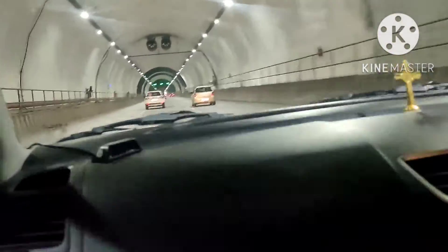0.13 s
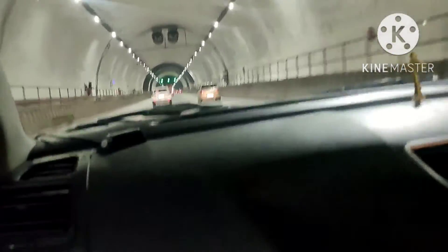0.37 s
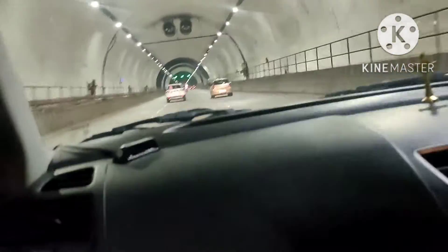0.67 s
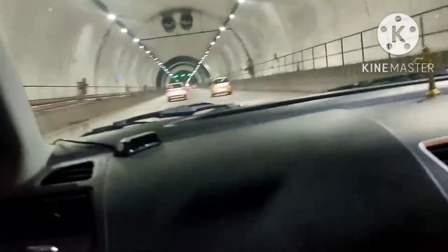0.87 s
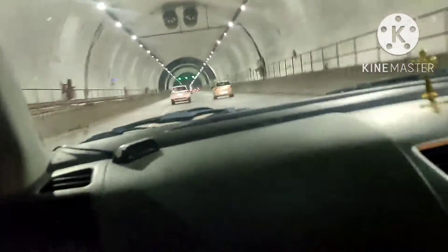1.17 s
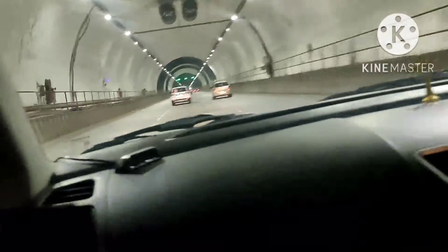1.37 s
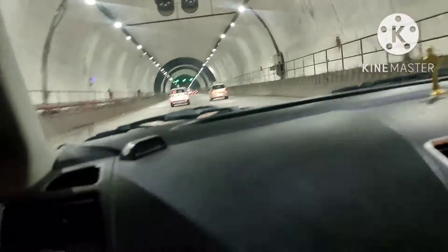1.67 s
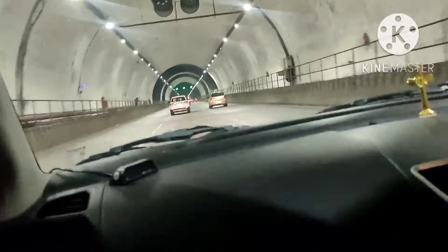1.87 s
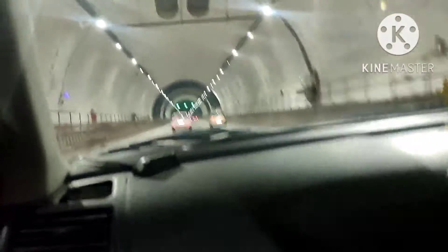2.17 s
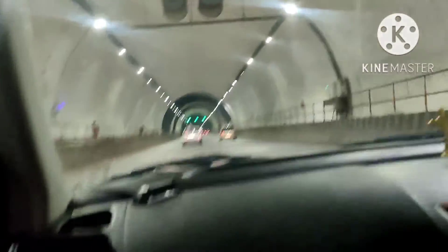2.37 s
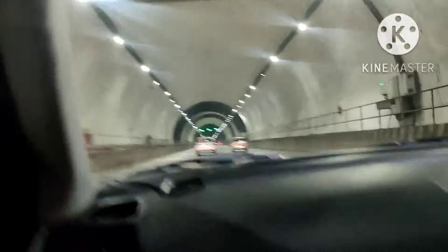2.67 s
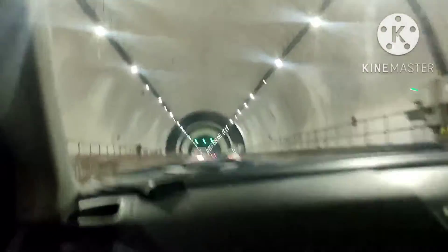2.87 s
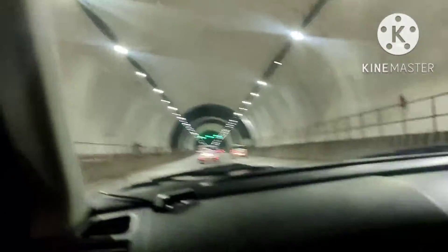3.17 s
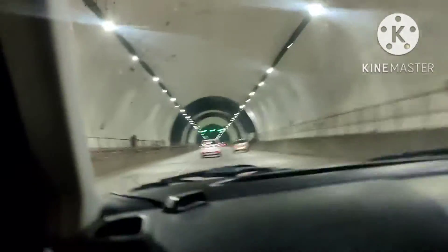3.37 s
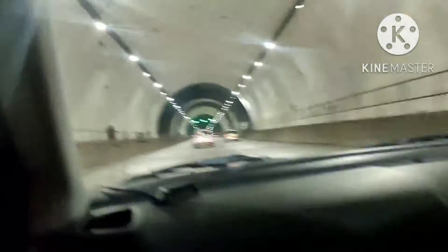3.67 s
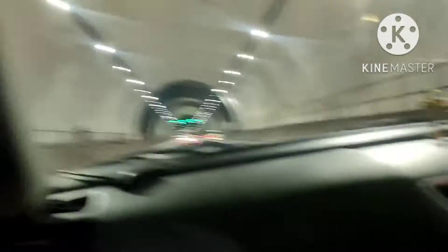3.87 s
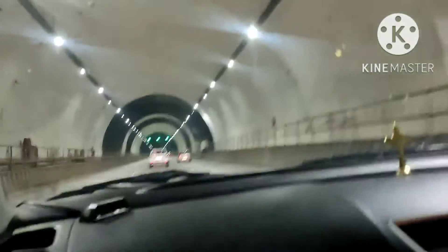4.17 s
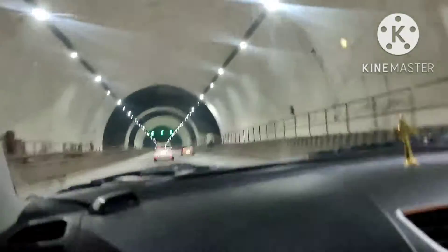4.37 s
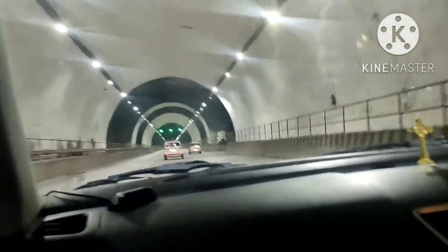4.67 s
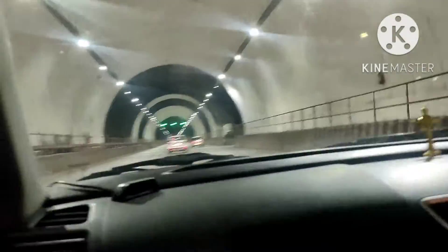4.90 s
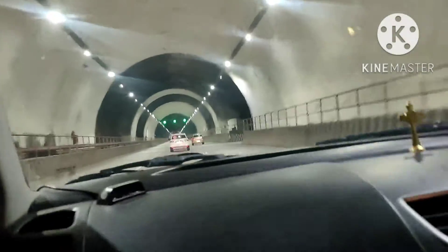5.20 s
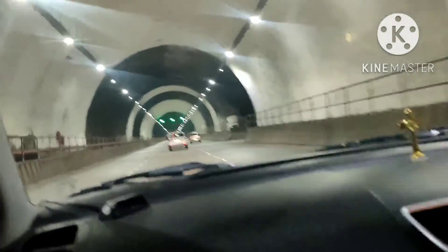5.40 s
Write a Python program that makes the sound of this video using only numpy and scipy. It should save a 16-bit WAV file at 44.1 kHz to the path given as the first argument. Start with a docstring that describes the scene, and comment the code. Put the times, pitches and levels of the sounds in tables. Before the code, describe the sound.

From the start, a deep, steady rumble fills the cabin of a car cruising through a road tunnel. The tyres add a wavering low hum and growl, and their smooth roar returns from the walls, muffled by the glass. A thin air hiss sits far behind. Loose plastic trim ticks lightly, close by and slightly left, most clearly at the very start and around 0.5 seconds. Dull, deep thuds mark road joints, with one near 1.7 seconds. From about 2.4 to 2.9 seconds a rough stretch brings the loudest rumble, a quick cluster of bumps and a small plastic chatter. The ride eases briefly at 3 seconds, then more thuds come near 3.4, 4 and 5.2 seconds. Scattered ticks and faint, hissy plastic rubbing continue around 3.6 to 5.1 seconds. The rumble carries on to the end at about 5.5 seconds.

```python
"""Inside a car cruising through a long road tunnel.
The road shakes the body, thuds at its joints and sets the cabin booming at its low modes.
The tyres hum and growl; their roar comes back from the tunnel walls through the glass.
Loose plastic trim ticks and rubs on the left, and chatters over a rough stretch halfway through.
A thin hiss of air sits behind it all."""
import sys
import numpy as np
from scipy import signal
from scipy.fft import rfft, irfft
from scipy.io import wavfile
from scipy.ndimage import uniform_filter1d

SR = 44100
rng = np.random.default_rng(int(sys.argv[2]) if len(sys.argv) > 2 else 0)


def wav_record(signal):
    """Record a signal, one row per channel, as 16-bit PCM in the file named by sys.argv[1]."""
    frames = np.transpose(np.atleast_2d(signal))
    bounded = np.clip(frames, -1, 1)
    # unit amplitude maps onto the largest positive 16-bit level
    quanta = np.round(bounded * 32767).astype(np.int16)
    wavfile.write(sys.argv[1], SR, quanta)


N = 244314
TIME, HZ = np.arange(N) / SR, np.maximum(np.arange(N // 2 + 1) * SR / N, 1)
SIDES = np.array([[1], [-1]])   # left, right; a positive pan_db leans left

# modes of the plastic trim: pitch_hz, level_db, t60_s, pan_db
PLASTIC_MODES = [(1900, -13, 0.017, 7.5), (2600, -5.5, 0.0068, -5), (3080, -10.5, 0.018, 1.5),
                 (3480, -7, 0.0077, -3), (4310, -6.5, 0.0073, 10), (5000, -5, 0.006, -4),
                 (5550, -9, 0.0046, 6), (6020, 0, 0.0047, 9), (6500, -1, 0.0068, 0), (7250, -9, 0.016, -15)]


def rumble(rough_db, body_lift_db, drone_lift_db):
    """Road texture drives the body and the cabin air; the air ring in the tyres hums."""
    # modes of the shaking body: pitch_hz, width_hz, level_db
    body_modes = [(22.3, 33, -7), (39.6, 22.4, -7), (45.5, 18, -12), (70.9, 6.2, -8)]
    # modes of the cabin air: pitch_hz, width_hz, level_db
    cabin_modes = [(100.2, 15, 0), (119, 18, 1), (133.5, 22, -6), (187, 24.1, -4.5)]
    # cabin drone on the usual road: time_s, level_db
    drone = [(0, -38.5), (.35, -32), (.52, -35.5), (.72, -33), (.9, -34), (1.3, -35), (2.4, -33),
             (3.2, -32), (4, -31.5), (4.7, -30.5), (5.54, -35)]
    body_db = -25.5 + 0.65 * rough_db + body_lift_db
    body = from_db(body_db) * steady(resonant_noise(body_modes), span_s=0.11)
    cabin_db = over_time(drone) + 0.76 * rough_db + drone_lift_db
    cabin = from_db(cabin_db) * steady(resonant_noise(cabin_modes), span_s=0.2)
    hum = from_db(-39.5 + 0.68 * rough_db) * steady(resonant_noise([(165.9, 14.0, 0)]), span_s=0.2)
    return body + cabin + hum * from_db(0.5 * throb(per_s=15))


def swells_and_dips(rise_s, fall_s):
    """Brief swells and dips in the body rumble, the drone and the growl, as three curves in dB."""
    # swells (+) and dips (-): centre_s, body_db, drone_db, growl_db
    lifts = [(0.221, -11.5, 8.5, -5), (1.2, 2, 5.5, -4.5), (1.86, -2, -2, 2), (2.01, 1.5, 4.5, -0.5),
             (2.111, 0, -2.5, 7.5), (2.37, 1, 5.5, 4), (2.58, 1, -3, -2.5), (2.639, -3, 3, 6.5),
             (2.765, 3, 2, -4.5), (2.82, 1.5, -5.5, 2), (3.01, -1, -8, 2.5), (3.402, 1.5, 4.5, 0),
             (3.56, 3, 7, -4.5), (3.77, 1, 0.5, 3.5), (3.98, 4, 2.5, -2), (4.119, 0, 3.5, -13.5),
             (4.65, 0.5, -2, 6.5), (5.12, 0.5, -3, -12), (5.22, -10, 5, 1), (5.41, 5.5, 6.5, -0.5)]
    return sum(np.outer(lifts_db, swell(s, rise_s, fall_s)) for s, *lifts_db in lifts)


def thuds(rise_s):
    """A road joint kicks the body through the suspension into one or two heavily damped swings."""
    # joints in the road: start_s, level_db, pitch_hz
    joints = [(0.424, -22, 61.7), (0.858, -24, 42), (1.38, -22, 36.3), (1.693, -15, 49.5), (2.389, -19, 40),
              (2.53, -17.5, 41.2), (2.56, -15.5, 94), (2.612, -12.5, 42.7), (2.625, -20, 135),
              (2.652, -19.5, 70), (2.69, -17, 45), (2.757, -12.5, 54.8), (2.801, -10, 39.7),
              (2.835, -16, 36.7), (3.377, -10, 35.6), (3.858, -15, 47), (3.986, -14.5, 44),
              (4.122, -17.5, 35.7), (5.188, -14, 42.6), (5.382, -20.5, 39.8)]
    out = np.zeros(N)
    for s, db, hz in joints:
        age = np.maximum(TIME - s, 0)
        envelope = age / rise_s * np.exp(1 - age / rise_s)
        out += from_db(db) * envelope * np.sin(2 * np.pi * hz * age)
    return out


def hum_swells(rise_s, fall_s, pan_db):
    """Now and then the air ring in a tyre builds up to a nearly pure tone and dies away."""
    # swells of the tyre hum: peak_s, level_db, pitch_hz
    swells = [(0.019, -28.5, 168.5), (.09, -26.5, 172), (.24, -30.5, 174.9), (.49, -27, 177.4),
              (0.649, -32.5, 174), (0.871, -29.5, 175.4), (1.1, -27.5, 166), (1.25, -33, 180),
              (1.38, -32, 173.6), (1.5, -27, 174.6), (1.71, -29.5, 160), (1.809, -24, 172),
              (2.035, -26.5, 165), (2.16, -27, 168), (2.29, -26, 166.4), (2.4, -24.5, 166.8),
              (2.63, -31, 174.3), (2.91, -26, 163), (3.13, -30.5, 167.4), (3.26, -27, 168),
              (3.439, -22.5, 172.9), (3.605, -28.5, 169.6), (3.885, -21, 166.1), (4.11, -31.5, 171),
              (4.231, -30.5, 173), (4.929, -30.5, 169.8), (5.02, -30, 166.5), (5.24, -22, 165.5)]
    tones = np.zeros(N)
    for s, db, hz in swells:
        tones += from_db(db) * swell(s, rise_s, fall_s) * np.sin(2 * np.pi * (hz * TIME + rng.random()))
    return tones * pan(pan_db)


def tyres(rough_db, growl_lift_db):
    """Tread noise growls in the panels and returns from the tunnel as a smooth, slowly sinking roar."""
    # panels driven by the tyres: pitch_hz, width_hz, level_db
    panel_modes = [(239.7, 34, -0.5), (295, 37, -3), (327.6, 17, 0)]
    # stiffer panels: pitch_hz, width_hz, level_db
    stiff_modes = [(439, 71, -2), (522, 68, -0.5)]
    # colour of the tunnel roar: frequency_hz, level_db
    roar_colour = [(150, -13.5), (300, -5.5), (450, -3), (600, -3.5), (760, -3.5), (1050, -4.5), (1450, -9),
                   (2200, -12.5), (2800, -19.5), (4000, -25.5), (8000, -49.5)]
    # tread resonances: pitch_hz, width_hz, level_db
    tread_modes = [(883.4, 52, -1.5), (1160, 15, -2)]
    growl_db = -42 + 0.46 * rough_db + growl_lift_db
    growl = from_db(growl_db) * steady(resonant_noise(panel_modes), span_s=0.28)
    stiff = from_db(-49.5 + 0.46 * rough_db) * resonant_noise(stiff_modes)
    roar = from_db(-46.5 - 0.15 * TIME) * cabin_noise(from_db(over_hz(roar_colour)))
    tread = from_db(-53.5 - 0.7 * TIME) * resonant_noise(tread_modes)
    return growl + stiff + roar + tread


def ticks(scatter_db, detune):
    """Each tick is a contact and a few quick rebounds; each spot of the trim adds its own short ring."""
    # trim contacts: start_s, level_db, low_modes_db, top_modes_db, pan_db,
    # spot_pitch_hz, spot_ring_db, loss_per_rebound_db
    contacts = [(.044, -35.5, -1, 2, 5, 6370, -15, 4), (.372, -45, -13, 4.5, -5, 7300, -1, 12),
                (.3863, -44, -14, 4, 1, 6900, -2, 9), (0.4284, -46, -7, .5, 0, 6860, -6, 7),
                (0.488, -42, 2, 0, 5, 6740, -2, 9), (.5077, -29.5, -7, 0, 6, 5560, -3, 21),
                (0.6218, -42.5, -9, 3, 4, 6860, 0, 14), (0.986, -47.5, -14, 3, 3, 7200, -3, 8),
                (1.745, -50, 2.5, -1, 6.5, 6500, -2, 1), (1.81, -37.5, -3, 4, 6.5, 6640, -4, 3.5),
                (2.069, -45, -11, -1, 2, 7000, 0, 12), (2.0988, -40, 5, -0.5, 7, 7300, -1, 16),
                (2.1759, -41.5, -4, -3.5, 5.5, 7000, -3, 18.5), (2.2992, -41, -16, 5, 6, 6600, -2, 5),
                (2.567, -47, -16, 0, 10, 6450, -4.5, 9), (2.653, -45, -5.5, -5, 10, 6350, 0, 8),
                (2.704, -43, 0, -11, 5, 6130, -1.5, 10), (2.713, -42, -8, -8, 8, 6150, 0, 8),
                (2.769, -41, -8, 0, 4, 6500, -7, 5), (2.785, -39.5, -3, -1, 5, 4330, 1, 1.5),
                (2.8066, -37, -3, -4, 7, 1850, 1.5, 1.1), (3.078, -43, -4, 3, 1, 6500, -10, 1.5),
                (3.6876, -36, -1, 2.5, 3, 6320, -6, 0), (3.724, -44, 1.5, 0, 4.5, 3940, 2, 0),
                (4.234, -52, -9, 0, 4, 7100, -3, 13), (4.4326, -40, 0, 0, 3, 6300, -3, 3),
                (4.587, -40.5, -3, -4, 5.5, 5300, -1, 0), (4.6677, -49, -11, 6, 2, 6960, -6, 6),
                (4.6942, -38.5, -1, 3.5, 8, 4400, 0, 3.5), (5.471, -38.5, -1.5, -2, 4, 6140, -7, 1.5)]
    rebound_s, spot_t60_s = 0.0017, 0.0045
    low_below_hz, top_above_hz, low_detune = 5300, 6300, 0.062
    out, bounce, size = np.zeros((2, N + SR)), np.arange(5), SR // 16
    for s, tick_db, low_db, top_db, pan_db, spot_hz, spot_db, loss_db in contacts:
        gaps_s = rebound_s * rng.uniform(.6, 1.8, len(bounce)) * (bounce > 0)
        hits, start = (np.cumsum(gaps_s) * SR).astype(int), int(s * SR)
        for hz, mode_db, t60, mode_pan_db in [*PLASTIC_MODES, (spot_hz, spot_db, spot_t60_s, 0)]:
            low = hz < low_below_hz
            # a heavier touch wakes the low modes, a harder one the top
            colour_db = low_db * low + top_db * (hz > top_above_hz)
            level_db = tick_db + mode_db + colour_db - loss_db * bounce
            level_db = level_db + scatter_db * rng.standard_normal((2, len(bounce)))
            polarity = rng.choice([-1, 1], level_db.shape)
            clicks = np.zeros((2, size))
            clicks[:, hits] = from_db(level_db) * polarity * pan(pan_db + mode_pan_db)
            shift = (low_detune if low else detune) * rng.uniform(-1, 1)   # no two spots ring alike
            out[:, start:start + size] += ring(clicks, hz * (1 + shift), t60)
    return out[:, :N]


def chatter(rough_db, per_s, spread_db, left_db, ring_share):
    """Countless tiny touches of the trim, damped while the faces meet; louder on a rough road."""
    touches = (rng.random(N) < per_s / SR) * from_db(spread_db * np.minimum(rng.exponential(1, N), 3))
    rings = sum(ring(touches * rng.standard_normal((2, N)) * from_db(db), hz, t60 * ring_share)
                for hz, db, t60, _ in PLASTIC_MODES)
    return from_db(-67.5 + rough_db) * rms_one(rings * from_db([[left_db], [0]]))


def rub(pan_db):
    """Two plastic faces slide on each other with a narrow, soft hiss; pressed harder they scrape."""
    # slides: centre_s, half_length_s, level_db, pitch_hz, width_hz, low_resonance_db, scrape_db
    slides = [(1.26, 0.093, -66, 6450, 800, -13, -13), (1.55, 0.14, -69, 6360, 800, -4, -14.5),
              (2.68, 0.083, -60.5, 6350, 700, -13, -14), (2.842, 0.07, -58, 6540, 1000, -5.5, -11),
              (3.46, 0.048, -71, 6500, 1000, -1, 5), (3.55, 0.08, -61, 6400, 1000, -1, -4),
              (3.637, 0.032, -57, 6550, 1000, -4, -2), (4.063, 0.19, -62.5, 6460, 1100, -2, -7),
              (4.38, 0.047, -68, 6500, 900, -5, 3), (5.07, 0.27, -59.5, 6400, 580, -3, -17.5)]
    low = resonant_noise([(3850, 620, 0)])
    scrape = resonant_noise([(5200, 430, 0)])
    out = np.zeros((2, N))
    for s, half_s, db, hz, width_hz, low_db, scrape_db in slides:
        hiss = resonant_noise([(hz, width_hz, 0)])
        friction = hiss + from_db(low_db) * low + from_db(scrape_db) * scrape
        out += from_db(db) * swell(s, half_s, half_s) * friction
    return out * pan(pan_db)


def reflections(x, t60, wet_db):
    """Glass and dashboard return a short, dense tail."""
    t = TIME[:SR // 4]
    tail = rng.standard_normal((2, len(t))) * from_db(-60 * t / t60) * (t > .002)
    tail /= np.sqrt(np.sum(tail ** 2, axis=1, keepdims=True))
    return x + from_db(wet_db) * signal.fftconvolve(x, tail, axes=1)[:, :N]


def air():
    """Air rushes past the pillars with a thin, even hiss."""
    # colour of the thin hiss, cut off steeply at the top: frequency_hz, level_db
    hiss_colour = [(1500, -7), (3000, -2), (4200, 6), (5100, -3.5), (5600, -0.5), (6200, 3), (6800, 5),
                   (7600, 4.5), (8000, -23.5)]
    return from_db(-61.5) * cabin_noise(from_db(over_hz(hiss_colour)))


def cabin_noise(gain):
    """Coloured stereo noise at unit power: long waves reach both sides alike, short ones do not."""
    # likeness of left and right: frequency_hz, correlation
    likeness = [(60, 0.98), (180, 0.98), (250, 0.89), (380, 0.61), (500, 0.76), (740, 0.6), (970, -0.21),
                (1150, 0.095), (1450, -0.36), (2200, 0.032), (5000, 0.048), (7500, 0.033)]
    # left-right balance of the noise: frequency_hz, pan_db
    balance = [(40, -0.6), (110, -1), (180, -2.5), (320, -4.5), (400, -2.5), (530, 3.5), (700, -1),
               (1400, 0), (2600, 4), (4200, 6), (6200, 15), (7300, -3.5)]
    mid, side = rfft(rng.standard_normal((2, N)))
    alike = over_hz(likeness)
    pair = np.sqrt(1 + alike) * mid + SIDES * np.sqrt(1 - alike) * side
    return rms_one(irfft(pair * gain * pan(over_hz(balance)), N))


def resonant_noise(modes):
    """Cabin noise through steep resonances (pitch_hz, width_hz, level_db) that add in power."""
    gains = [from_db(db) / (1 + ((HZ ** 2 - hz ** 2) / (HZ * width)) ** 2 / 2) for hz, width, db in modes]
    return cabin_noise(np.sqrt(np.sum(np.square(gains), axis=0)))


def ring(clicks, hz, t60):
    """Each click sets a tone ringing, with little sound far below its pitch."""
    radius, angle = from_db(-60 / (t60 * SR)), 2 * np.pi * hz / SR
    low_cut = np.array([1, -2, 1]) / (2 * np.tan(angle / 2))
    return signal.lfilter(low_cut, [1, -2 * radius * np.cos(angle), radius ** 2], clicks + 1e-18)


def steady(x, span_s):
    """Hold the power even over a span, leaving the faster flutter."""
    power = uniform_filter1d(np.mean(x ** 2, axis=0), int(span_s * SR))
    return x / np.sqrt(power + 1e-12)


def throb(per_s):
    """A random wobble that glides to a new value so many times a second."""
    return np.interp(TIME * per_s, np.arange(SR // 100), rng.standard_normal(SR // 100))


def swell(at_s, rise_s, fall_s):
    """A rounded rise to 1 and a fall."""
    return np.exp(-((TIME - at_s) / np.where(TIME < at_s, rise_s, fall_s)) ** 2)


def over_time(points):
    """An envelope of straight lines between points."""
    return np.interp(TIME, *np.transpose(points))


def over_hz(points):
    """A curve of straight lines on a log-frequency axis."""
    hz, value = np.transpose(points)
    return np.interp(np.log(HZ), np.log(hz), value)


def pan(db):
    """Two gains that put the left so many dB above the right."""
    return from_db(SIDES * db / 2)


def from_db(db):
    """Decibels to gain."""
    return 10 ** (np.asarray(db) / 20)


def rms_one(x):
    """Scale to unit power."""
    return x / np.sqrt(np.mean(x ** 2) + 1e-20)


def scene():
    """Rumble, roar and hiss with the trim close by; road roughness drives rumble, growl and chatter."""
    # roughness of the road: time_s, level_db
    road = [(0, -20.5), (.55, -26.5), (1.5, -24.5), (2.2, -22.5), (2.55, -17.5), (2.8, -18), (2.98, -26),
            (3.25, -25.5), (3.5, -23), (4.05, -22.5), (4.5, -25.5), (5.25, -23), (5.54, -24.5)]
    rough_db = over_time(road) + 24   # 0 dB on the usual road
    body_lift_db, drone_lift_db, growl_lift_db = swells_and_dips(rise_s=0.042, fall_s=0.031)
    drive = rumble(rough_db, body_lift_db, drone_lift_db) + thuds(rise_s=0.011)
    drive += hum_swells(rise_s=0.023, fall_s=0.034, pan_db=-3.0)
    drive += tyres(rough_db, growl_lift_db) + air()
    trim = ticks(scatter_db=2.0, detune=0.025)
    trim += chatter(rough_db, per_s=900, spread_db=9.0, left_db=0.5, ring_share=0.93)
    return drive + rub(pan_db=3) + reflections(trim, t60=0.08, wet_db=-5.0)


def record(dry):
    """The sound eases in over a few milliseconds; the top is cut steeply."""
    fade_s, cutoff_hz = 0.004, 7820
    eased = dry * np.minimum(TIME / fade_s, 1)
    return signal.sosfilt(signal.butter(30, cutoff_hz, fs=SR, output="sos"), eased)


dry = scene()
out = record(dry)
wav_record(out)
```